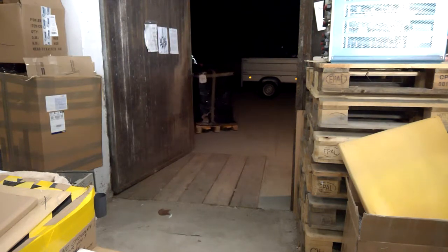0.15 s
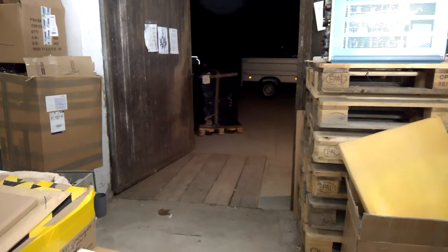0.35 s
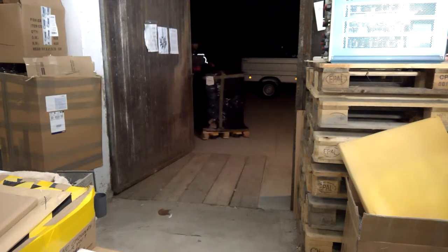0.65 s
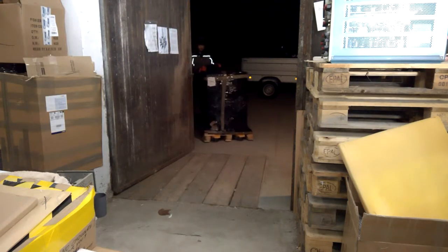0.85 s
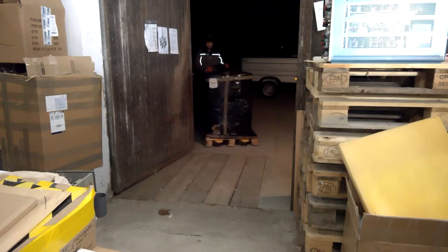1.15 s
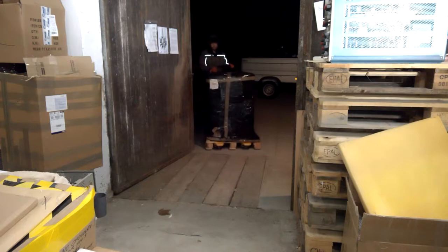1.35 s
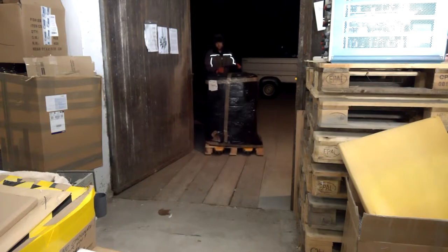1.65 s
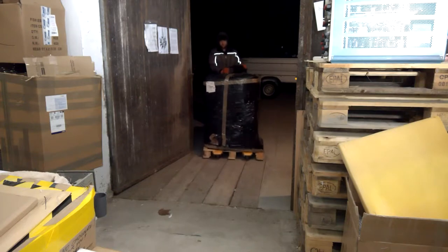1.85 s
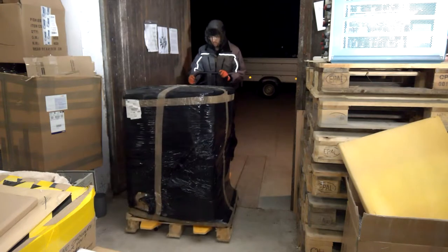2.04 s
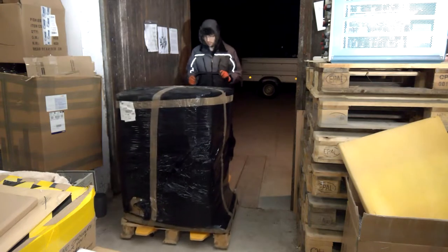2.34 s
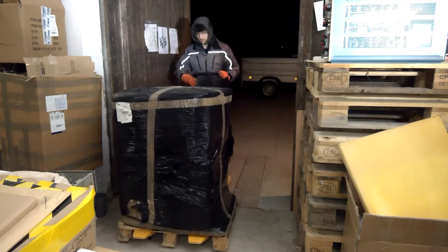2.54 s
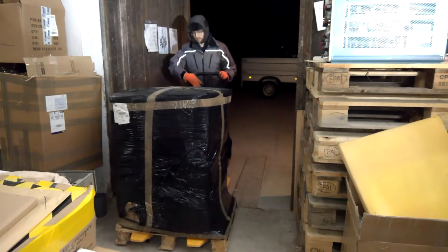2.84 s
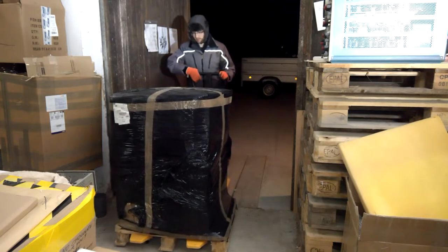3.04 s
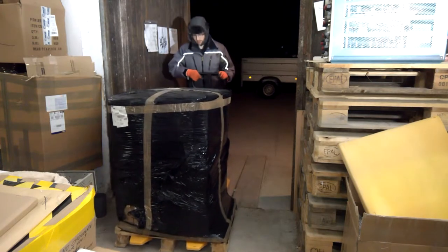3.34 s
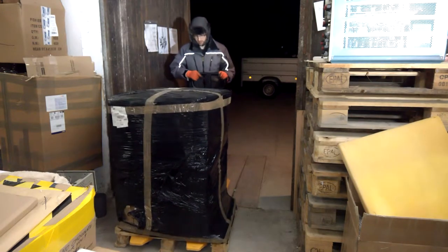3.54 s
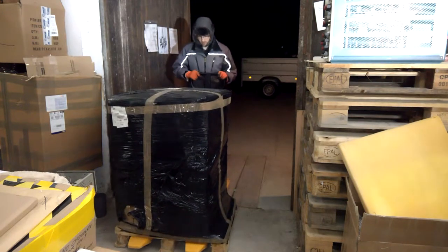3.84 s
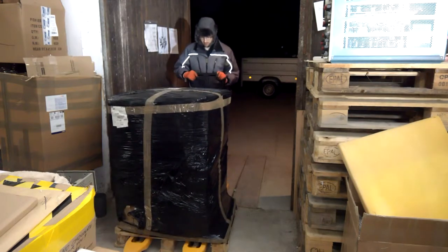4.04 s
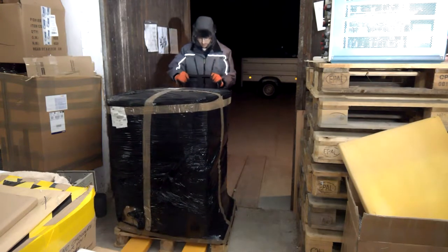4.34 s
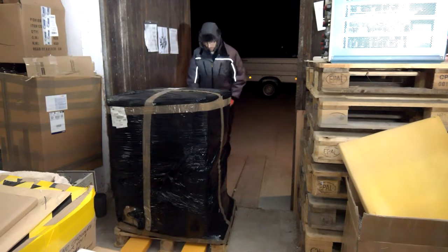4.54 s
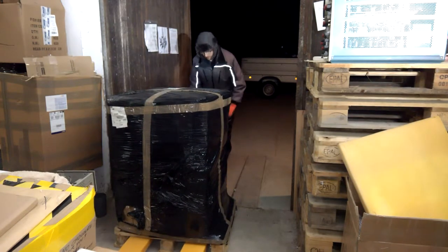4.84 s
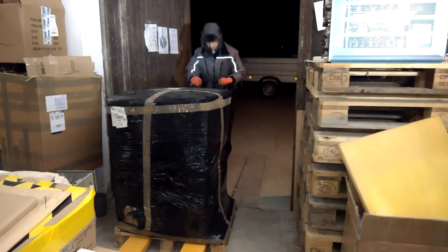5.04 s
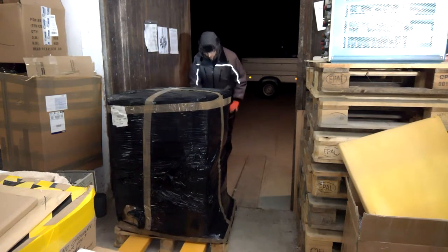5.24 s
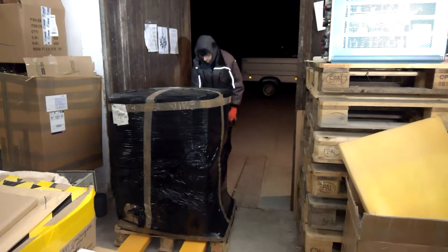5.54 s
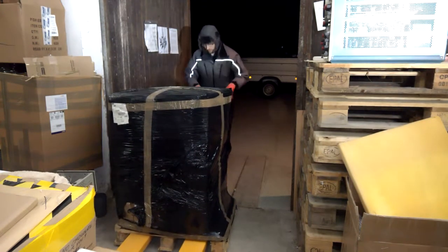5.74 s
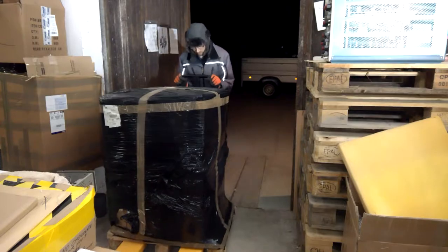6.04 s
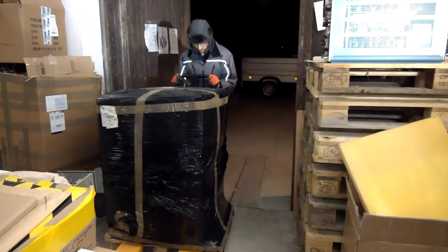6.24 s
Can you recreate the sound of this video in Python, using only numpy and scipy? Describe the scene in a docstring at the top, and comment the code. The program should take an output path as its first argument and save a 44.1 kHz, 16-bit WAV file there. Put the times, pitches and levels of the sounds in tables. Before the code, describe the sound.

Pallet truck wheels roll and rattle over booming boards, followed by close scuffs, rustling, a sharp metal clank and rapid pumping.

```python
"""A loaded hand pallet truck rolls over a hard floor and bumps over two edges. Its wheels shake the steel
frame, and the floor boards boom under the load. Then the scene changes: close by, the truck is pushed to and
fro: wheels rumble, soles scuff, wrap and clothes rustle, and steps thud. The handle clanks down and is pumped
in nine quick strokes, each a hollow knock with ringing steel. Loose parts tick and a dry joint squeaks. The
room adds a short echo to the blows, and a soft hush lies under the close sounds."""
import sys
import numpy as np
from scipy import signal
from scipy.fft import rfft, irfft, next_fast_len
from scipy.io import wavfile

SR = 44100
rng = np.random.default_rng(int(sys.argv[2]) if len(sys.argv) > 2 else 0)


def dump_mix(stems):
    """Bounce the given channels to the path in sys.argv[1] as a 16-bit WAV at rate SR."""
    frames = np.atleast_2d(stems).T  # one column per channel
    limited = np.clip(frames, -1, 1)  # hard clip at full scale
    pcm = np.round(limited * 32767).astype(np.int16)
    wavfile.write(sys.argv[1], SR, pcm)


N = 281358
CLOSE_START = round(1.8995 * SR)   # the sample where the close part begins
BLOW_WIDTH = .52   # a blow comes from one spot, so its left and right differ less

# Levels are relative. t60 is the time a sound takes to fade by 60 dB.
# A mode is a pitch at which a thing likes to ring. A spectrum says how strong each pitch is.
# The truck rolling in: t/s, rolling level/dB, rattle level/dB, grit level/dB, most shaken f/Hz
ROLL_IN = [(0.0, -37, -46, -57.5, 1270), (0.2, -37, -46.5, -59.5, 1600), (0.6, -36.5, -46, -56.5, 1600),
           (0.74, -37, -53, -58, 1600), (0.9, -40.5, -58.5, -61, 1100), (1.0, -29, -45, -48, 1100),
           (1.15, -31, -43, -53, 1100), (1.2, -33.5, -44.5, -55, 1270), (1.34, -33.5, -42, -50.5, 1270),
           (1.42, -33, -42.5, -51, 1600), (1.52, -34.5, -38.5, -50, 1600), (1.71, -32.5, -35, -51, 1600),
           (1.8, -30, -36, -47, 1600), (1.9, -35, -46.5, -50, 1600)]
# Modes of the forks and frame: f/Hz, width/Hz, level/dB
FRAME_MODES = [(459.3, 66, -0.5), (744, 62, -3), (1018, 29, -4), (1100, 40, -6.5), (1275, 35, -2.5),
               (1612, 40, -6), (2078, 160, -11.5), (2803, 60, -11), (2974, 68, -12.5), (3592, 80, -18.5),
               (3840, 50, -20.5), (4315, 140, -23), (4834, 190, -22), (5230, 70, -24), (6240, 207, -27)]
# Spectra of the noise between the frame's low modes and between its high ones: f/Hz, level/dB
LOW_FRAME_NOISE = [(180, -49.5), (300, -18), (467, -0.5), (1100, -7.5), (1600, -9), (2500, -29),
                   (3250, -54), (5500, -120)]
HIGH_FRAME_NOISE = [(1350, -33.5), (2300, -5.5), (2930, 0), (3210, -6), (6000, -19), (7800, -36),
                    (13200, -120)]
# Spectra of wheel rumble and of floor grit: f/Hz, level/dB
RUMBLE_SPECTRUM = [(15, -37.5), (40, -23.5), (60, -2), (92, -0.5), (134, -3.5), (162, 6.5), (260, 0.5),
                   (328, -3.5), (400, -5.5), (520, -27.5), (880, -120)]
GRIT_SPECTRUM = [(2940, -40.5), (5000, -17), (7000, -10.5), (9330, -13), (12000, -23), (14300, -24.5),
                 (19000, -21.5)]
# Bumps over edges, and handle clanks: t/s, clatter level/dB, step up per band/dB, thump level/dB, t60/s
EDGE_BUMPS = [(0.929, -35, 10, -73, 0.16), (0.934, -32.5, -14.5, -33.5, 0.19),
              (1.777, -67.5, -12.5, -36, 0.43), (1.803, -59.5, -7.5, -41, 0.22),
              (1.83, -47, 0, -36.5, 0.36), (1.848, -62, -12.5, -47, 0.11), (1.877, -47.5, 3, -25, 0.41),
              (1.885, -58, -13.5, -29.5, 0.24)]
HANDLE_CLANKS = [(2.289, -55, 12, -62, 0.11), (2.4845, -57, 12, -82, 0.18), (2.508, -54, 16, -80, .13),
                 (2.524, -50, 9, -74, 0.15), (2.712, -64.5, -21.5, -51, 0.17),
                 (2.7965, -45.5, -1.5, -44, 0.061), (3.083, -42.5, 2.5, -51.5, 0.24),
                 (3.446, -55, 1.5, -87, 0.6), (3.486, -40.5, 0.5, -81, 0.19),
                 (3.583, -55.5, -6.5, -84, 0.4), (4.238, -46.5, -5, -75, 0.3), (4.259, -39, 0.5, -67, 0.21),
                 (4.279, -35, -4, -56, 0.16), (4.2936, -22, 8, -36.5, .11), (4.348, -51.5, 16, -63, 0.064),
                 (4.3955, -38, 14, -70, 0.091), (4.515, -53.5, 2.5, -64, 0.089),
                 (5.931, -44.5, 4.5, -55, .1), (5.957, -55.5, 13, -73, 0.24), (5.994, -45, -3.5, -47, 0.22),
                 (6.01, -49.5, 11, -58, 0.12), (6.078, -58, 18.5, -80, 0.035), (6.108, -56.5, 4, -63, 0.11),
                 (6.152, -57, 18, -81, 0.32), (6.163, -47, 12, -68, 0.074), (6.187, -55, 14, -75, .04),
                 (6.273, -49, 9.5, -69, 0.14), (6.286, -42.5, 4.5, -65, 0.16),
                 (6.297, -33.5, 7.5, -54, 0.093)]
# Modes of the loaded pallet and the floor boards: f/Hz, level/dB, t60/s
BOARD_MODES = [(104, -13.5, 0.057), (232, -0.5, .06), (386, -1.5, 0.03), (584, -3.5, 0.015)]
# Booms of the floor boards: t/s, level/dB, f/Hz, t60/s
BOARD_BOOMS = [(.937, -19, 455, .12), (.94, -18, 720, .16), (.938, -17, 1085, 0.16), (.937, -18, 1310, .1),
               (.938, -14, 1540, .1), (.936, -21, 1760, .06), (.938, -20, 290, .15),
               (1.779, -15.5, 205, 0.65), (1.6, -22.5, 400, .1), (1.779, -23, 850, .06),
               (1.743, -26.5, 215, .3), (1.8, -28, 102, 0.65), (1.803, -21, 396, 0.47),
               (1.879, -13.5, 280, 0.43), (1.879, -11.5, 642, .07), (1.878, -17, 820, .06),
               (2.1, -16, 760, .08), (1.879, -18, 407, .2)]
# Pump strokes: t/s, knock level/dB, its low notes/dB, steel level/dB, knock f/Hz, steel f/Hz,
# wait until the handle is back/s
PUMP_STROKES = [(4.643, -33, -4, -40, 1400, 3000, 0.118), (4.789, -30.5, -11, -34.5, 1360, 3000, 0.112),
                (4.935, -31, -4.5, -36, 1330, 2880, 0.11), (5.08, -30.5, 1.5, -37.5, 1010, 2800, 0.1),
                (5.22, -28.5, 2.5, -38.5, 1010, 3520, 0.11), (5.368, -27, -1, -36, 1000, 3330, .11),
                (5.511, -26.5, -4, -37, 1050, 3140, .102), (5.658, -27.5, 2.5, -38, 1070, 3200, 0.098),
                (5.803, -28, 1.5, -39, 1040, 3170, 0.095)]
# Modes of the pump's hollow, the pump's steel, the handle and a free lever: f/Hz, level/dB, t60/s
HOLLOW_MODES = [(602, -10.5, 0.053), (706, -13, 0.043), (866, -6.5, .03), (1011, -2, .045),
                (1103, -4.5, 0.049), (1200, 1.5, .035), (1464, 2.5, 0.044)]
STEEL_MODES = [(2400, -6.5, 0.036), (2703, -2, .035), (3150, -1.5, .035), (3494, -6.5, 0.028),
               (3740, -4.5, .045), (4080, -8, 0.027), (4520, -3, 0.034), (4700, -1, 0.033), (5080, 0, 0.04),
               (5490, -3.5, .035), (6640, 2.5, 0.034), (7600, -5, 0.044), (8170, -6, .04), (9400, -7, .03),
               (10220, -8, .035), (11600, -3, .03), (13500, -8, .025), (14900, -7, .035)]
HANDLE_MODES = [(7100, -3.5, .07), (7560, -8, .08), (8146, -2.5, .07), (8450, -7.5, .07), (10420, -5, .07),
                (10650, -12.5, .1), (11700, -21.5, .1), (13700, -9, .08), (13880, -8.5, .08),
                (14650, -9.5, .08), (14900, -4, .075)]
LEVER_MODES = [(1997, -17, 0.11), (3370, -20, .1), (3920, -12, 0.11), (4110, -12, 0.15), (4780, -16, .06),
               (4925, -9, 0.1), (5015, 1.5, 0.11), (5010, -19, 0.38), (5000, -4, 0.091), (5935, -10, 0.093),
               (7965, -14, .07)]
# Nudges on the lever: t/s, level/dB, contact time/s
LEVER_NUDGES = [(3.077, -22, 0.012), (3.108, -32, .004), (3.132, -42, .004), (3.188, -46.5, .005)]
# Knocks with one clear pitch: t/s, level/dB, f/Hz, t60/s
PITCHED_KNOCKS = [(2.4, -46, 240, 0.11), (2.72, -39.5, 770, 0.15), (2.725, -41, 210, 0.14),
                  (3.2, -49, 150, 0.18), (4.134, -40, 450, 0.17), (4.5, -48.5, 540, 0.11),
                  (2.8, -36.5, 690, 0.14), (3.1, -46.5, 570, 0.099), (3.584, -34, 1610, 0.091),
                  (6.3, -28.5, 2520, 0.036), (6.299, -21.5, 3090, 0.027), (2.5, -46, 2950, 0.18),
                  (4.3, -33, 780, 0.13), (4.316, -35.5, 820, .08), (4.315, -32.5, 2700, .06),
                  (4.268, -38, 1200, .08), (4.394, -20.5, 3760, 0.044)]
# Cracks of hard contact: t/s, level/dB, lowest f/Hz, highest f/Hz
HARD_CRACKS = [(2.485, -26.5, 4020, 8800), (2.7974, -24.5, 3510, 9900), (4.2943, 2, 2520, 14900),
               (4.395, -15, 2480, 15100), (6.2968, -12, 1980, 9000)]
# Bright ticks of loose parts, and light touches on the lever (the rows near 5 kHz at 2.876, 2.928, 3.328,
# 3.345, 3.42 and 3.85 s): t/s, level/dB, f/Hz
BRIGHT_TICKS = [(.131, -50.5, 7000), (.385, -59, 4500), (.435, -55, 4200), (.79, -51, 8000),
                (1.045, -47, 8000), (1.853, -48, 9000), (0.2393, -45.5, 3120), (0.636, -42.5, 4050),
                (1.122, -44, 3220), (1.18, -38.5, 7600), (1.3513, -31, 11500), (1.52, -52, 3300),
                (1.6, -59, 3300), (1.702, -43, 3780), (1.736, -35.5, 3720), (2.0157, -44.5, 10600),
                (2.252, -46.5, 5800), (2.068, -51, 9500), (2.109, -53, 10500), (2.16, -51, 5000),
                (2.19, -55, 5000), (2.876, -53, 5000), (2.928, -54, 5000), (3.328, -59, 5300),
                (3.345, -55, 5200), (3.42, -64, 5000), (3.93, -62.5, 5300), (2.66, -52, 4400),
                (3.77, -60, 4900), (3.85, -63, 5200), (4.009, -63, 8700), (4.0367, -54, 10600),
                (4.0647, -54, 7360), (4.088, -50.5, 9330), (4.148, -41, 10100), (4.446, -49.5, 8500),
                (4.728, -59, 13000), (5.239, -37.5, 10100)]
# Squeaks of a dry joint: t/s, length/s, level/dB
JOINT_SQUEAKS = [(6.194, .048, -46.5), (6.322, 0.05, -44)]
# Modes of that joint: f/Hz, width/Hz, level/dB
JOINT_MODES = [(3470, 77, -16), (5750, 94, -2), (7300, 72, 3), (9100, 400, -8), (9990, 54, -12),
               (11700, 320, 0), (12300, 41, -7)]
# Pushing to and fro close by: t/s, rumble level/dB, scuff level/dB, rustle level/dB
TO_AND_FRO = [(1.9, -44, -48.5, -54.5), (1.99, -46, -49.5, -53), (2.14, -42.5, -46, -55.5),
              (2.25, -46, -50.5, -48.5), (2.37, -46, -39.5, -43.5), (2.45, -51, -47.5, -50.5),
              (2.56, -47.5, -49.5, -52), (2.65, -55, -56, -55), (2.8, -55, -40, -43.5),
              (2.89, -49.5, -48, -56), (2.93, -93, -54.5, -52), (3.05, -82, -52, -54),
              (3.33, -93, -57.5, -59), (3.41, -102, -58, -66), (3.5, -59.5, -51.5, -57),
              (3.7, -100, -59.5, -65), (3.86, -74, -67.5, -72.5), (4.07, -59.5, -64, -59.5),
              (4.21, -42.5, -54.5, -53.5), (4.26, -61, -54, -64), (4.35, -67, -63, -45),
              (4.57, -75, -76, -63.5), (4.75, -73.5, -71, -91.5), (5.3, -70, -70, -70),
              (5.88, -64.5, -69.5, -73), (5.92, -79, -66, -63), (6.0, -81, -40.5, -40),
              (6.13, -92.5, -77, -64), (6.165, -84.5, -49, -57), (6.22, -71, -66.5, -57),
              (6.38, -81, -47.5, -42.5)]
# Spectra of scuffing on the floor and of rustling wrap and clothes: f/Hz, level/dB
SCUFF_SPECTRUM = [(88, -24), (150, -6), (408, -9.5), (673, -2), (802, -6.5), (1170, -7.5), (2180, -9),
                  (3800, -15.5), (4940, -50), (8360, -120)]
RUSTLE_SPECTRUM = [(1650, 38.5), (2800, -34.5), (3290, 2.5), (5680, 5), (11500, -3.5), (13800, -1.5),
                   (15500, 14), (16300, -40)]
# Steps felt through the floor: t/s, level/dB
FOOTSTEPS = [(2.685, -35), (2.986, -42.5), (3.198, -50), (3.59, -46.5)]
# Spectrum of the room's hush: f/Hz, level/dB
HUSH_SPECTRUM = [(15, -10.5), (25, -21.5), (80, -23), (665, -13.5), (826, -20.5), (1210, -19),
                 (1860, -16.5), (3040, -15), (6670, -20), (14600, -14.5), (16300, -31)]
# The four bands of a blow (thump, then low, middle and high clatter): lowest f/Hz, highest f/Hz
BLOW_BANDS = [(80, 600), (600, 2000), (2000, 6000), (6000, 16000)]
# How alike left and right are: f/Hz, likeness (1 = the same)
STEREO_LIKENESS = [(60, 0.99), (240, 0.96), (950, 0.87), (3770, 0.31), (15000, 0.026)]


def rolling_truck():
    """Flat spots on the wheels and the rough floor shake the frame: rumble, ringing and hissing grit."""
    rolling_db, rattle_db, grit_db, shaken_hz = (curve[:CLOSE_START] for curve in curves(ROLL_IN))
    count = CLOSE_START
    shake = grainy(per_s=300, depth=.6, count=count) * from_db(drift(12, count))
    rumble_db = -39.5 + .79 * (rolling_db - rolling_db.mean())   # swings less than the rolling level
    out = from_db(rumble_db) * coloured(noise_pair(count), RUMBLE_SPECTRUM, flicker_db=3)
    out += from_db(grit_db) * coloured(shake, GRIT_SPECTRUM, flicker_db=-.5)
    for level_db, modes, spectrum in ((rolling_db, FRAME_MODES[:7], LOW_FRAME_NOISE),
                                      (rattle_db, FRAME_MODES[7:], HIGH_FRAME_NOISE)):
        ringing = 0
        for hz, width, db in modes:
            lift_db = 8 * np.exp(-(np.log2(hz / shaken_hz) / .066) ** 2)   # near the most shaken pitch
            mode = resonate(resonate(shake, hz, 1.5 * width), hz, 1.5 * width)
            ringing += from_db(db + lift_db + 3 * drift(7, count)) * stereo(mode, hz)
        between = coloured(shake[::-1], spectrum, flicker_db=2)   # same grains, the other noise
        out += from_db(level_db) * normalise(normalise(ringing) + from_db(-3) * between)
    return out


def edge_bumps():
    """The wheels hit edges in the floor, which makes the boards and forks ring."""
    fork_modes = [(hz, db, np.log(1000) / np.pi / width) for hz, width, db in FRAME_MODES[1:]]
    return blows(EDGE_BUMPS, BOARD_MODES + fork_modes, ring_db=[9, -.5, -5, -1.5],
                 middle_db=6, rise_s=.0049, t60_ratio=.83)


def board_booms():
    """The floor boards boom under the load; each boom is one fading tone."""
    start_s, db, hz, t60 = np.array(BOARD_BOOMS).T[:, :, None]
    age = np.maximum(np.arange(CLOSE_START) / SR - start_s, 0)
    return (from_db(db - 60 * age / t60) * np.sin(2 * np.pi * hz * age)).sum(axis=0)


def pump():
    """Each stroke knocks on the hollow pump and rings its steel; both sound once more, faintly."""
    out = np.zeros((2, N))
    for start_s, knock_db, low_db, steel_db, knock_hz, steel_hz, _ in PUMP_STROKES:
        # Modes near the stroke's pitches ring most; the low notes have a level of their own.
        hollow = [(hz, db + (low_db if hz < 800 else -30 * abs(np.log2(hz / knock_hz))), t60)
                  for hz, db, t60 in HOLLOW_MODES]
        steel = [(hz, db - 9 * abs(np.log2(hz / steel_hz)), t60) for hz, db, t60 in STEEL_MODES]
        knock = from_db(5.5) * struck(hollow, rise_s=.0023, scatter_db=1.5)
        knock += from_db(-12) * stereo_band(burst(.098, .0062, 6000), .6 * knock_hz, 1.59 * knock_hz)
        knock += from_db(low_db - 24) * stereo_band(burst(.16, .008, 6000), 238, 660)
        contact = burst(t60=.1, rise_s=.0017, count=6000)
        clack, tick = (from_db(-2) * stereo_band(contact, *edges) for edges in BLOW_BANDS[2:])
        clack += from_db(11) * struck(steel, rise_s=.0014, scatter_db=2.5)
        add(out, start_s, from_db(knock_db) * knock + from_db(steel_db) * (clack + from_db(-2) * tick))
        add(out, start_s + .042, from_db(knock_db - 25) * knock)   # the knock bounces back
        add(out, start_s + .026, from_db(steel_db - 22.5) * (clack + tick)[::-1])   # steel touches again
    return out


def handle_clanks():
    """The handle clanks and rings the truck; its parts are too small to make deep bass."""
    modes = BOARD_MODES[2:] + HOLLOW_MODES + within(STEEL_MODES, *BLOW_BANDS[2]) + HANDLE_MODES
    clanks = blows(HANDLE_CLANKS, modes, ring_db=[-2, -19, -15.5, -16],
                   middle_db=3.5, rise_s=.0055, t60_ratio=.93, hard_below_s=.115)
    return filtered(clanks, "high", 220)


def knocks():
    """Short bursts of noise, each ringing at one clear pitch."""
    out = np.zeros((2, N))
    width_hz = 260
    for start_s, db, hz, t60 in PITCHED_KNOCKS:
        contact = burst(t60, rise_s=.00099, crack=0)
        ringing = resonate(resonate(contact, hz, width_hz), hz, 2 * width_hz)
        add(out, start_s, from_db(db) * stereo(ringing, hz) * np.sqrt(SR / width_hz))
    return out


def cracks():
    """Hard contact makes a bare crack: one click, cut down to a band of pitches."""
    out = np.zeros((2, N))
    click = np.zeros((2, 400))
    click[0, 0] = SR / 2
    for start_s, db, low_hz, high_hz in HARD_CRACKS:
        add(out, start_s, from_db(db) * stereo_band(click, low_hz, high_hz) / (high_hz - low_hz))
    return out


def lever():
    """A few nudges leave a free steel lever ringing, a little roughly."""
    out = np.zeros((2, N))
    for start_s, db, contact_s in LEVER_NUDGES:
        nudge = burst(t60=8 * contact_s, rise_s=contact_s, count=14000, crack=0)
        rough = ring_modes(nudge, LEVER_MODES, scatter_db=-1.5)
        clear = struck(LEVER_MODES, contact_s, scatter_db=-.5, count=14000)
        add(out, start_s, from_db(db) * (clear + from_db(-3.5) * rough))
    return out


def ticks():
    """Loose parts tick brightly, light touches on the lever tick near 5 kHz, and the handle ticks faintly as it
    comes back after each stroke."""
    out = np.zeros((2, N))
    handle_returns = [(start_s + wait_s, -57.5, 5570) for start_s, *_, wait_s in PUMP_STROKES]
    for start_s, db, hz in BRIGHT_TICKS + handle_returns:
        snap = burst(t60=.082, rise_s=.0029, count=4400)
        add(out, start_s, from_db(db) * stereo_band(snap, .533 * hz, min(2.25 * hz, .45 * SR)))
    return out


def squeaks():
    """A dry joint slips unevenly, which rings its high modes."""
    out = np.zeros((2, N))
    for start_s, length_s, level_db in JOINT_SQUEAKS:
        slips = grainy(per_s=200, depth=.9, count=round(length_s * SR))
        slips = np.pad(slips, ((0, 0), (0, 900)))   # time to ring out
        ringing = sum(from_db(db) * stereo(resonate(slips, hz, width), hz)
                      for hz, width, db in JOINT_MODES)
        add(out, start_s, from_db(level_db) * normalise(ringing))
    return out


def scrape():
    """A dull, grainy scrape swells, holds for a moment and stops."""
    t = np.arange(N) / SR
    full_s, end_s = 4.194, 4.24
    level_db = -43 - 99 * np.maximum(full_s - t, 0) - 600 * np.maximum(t - end_s, 0)
    return from_db(level_db) * stereo_band(grainy(per_s=200, depth=.16, count=N), 200, 880)


def pushing_to_and_fro():
    """Slow wheels and steps rumble, soles and pallet scuff the floor, wrap and clothes crinkle."""
    count = N - CLOSE_START
    rumble, scuff, rustle = from_db(curves(TO_AND_FRO))[:, CLOSE_START:]
    unsteady = from_db(2 * drift(14, count))
    rubbing = grainy(per_s=150, depth=.3, count=count) * unsteady
    crinkling = grainy(per_s=150, depth=.45, count=count) * unsteady
    layers = [(rumble + footstep_gain()[CLOSE_START:], noise_pair(count), RUMBLE_SPECTRUM),
              (scuff, rubbing, SCUFF_SPECTRUM),
              (rustle, crinkling, RUSTLE_SPECTRUM)]
    return sum(gain * coloured(noise, spectrum, flicker_db=2) for gain, noise, spectrum in layers)


def footstep_gain(rise_s=.013, t60=.29):
    """Each step makes the floor's rumble swell and fade."""
    start_s, db = np.array(FOOTSTEPS).T[:, :, None]
    age = np.maximum(np.arange(N) / SR - start_s, 0)
    return (from_db(db - 60 * age / t60) * (1 - np.exp(-age / rise_s))).sum(axis=0)


def room_hush():
    """The room's soft, even noise under the close sounds."""
    return from_db(-68) * coloured(noise_pair(N - CLOSE_START), HUSH_SPECTRUM, flicker_db=2)


def with_echo(x, t60=.14, wall_cut_hz=9000):
    """Sound bounces between the walls on six paths a side, weaker and duller on every trip."""
    size = next_fast_len(x.shape[1] + SR)
    hz = np.arange(size // 2 + 1) * SR / size
    trip_s = rng.uniform(.012, .035, (2, 6, 1))
    one_trip = from_db(-60 * trip_s / t60) / (1 + 1j * hz / wall_cut_hz)
    one_trip *= np.exp(-2j * np.pi * hz * trip_s)   # the delay
    all_trips = (one_trip / (1 - one_trip)).sum(axis=1)
    echoes = irfft(rfft(x.mean(axis=0), size) * all_trips, size)
    return x + from_db(-22) * echoes[:, :x.shape[1]]


def blows(rows, modes, ring_db, middle_db, rise_s, t60_ratio, hard_below_s=0):
    """Each blow is a thump and three bands of clatter that ring the body; higher bands fade sooner."""
    out = np.zeros((2, N))
    for start_s, db, bright_db, thump_db, t60 in rows:
        levels_db = thump_db, db - bright_db, db + middle_db, db + bright_db
        contact_s = .0007 if t60 < hard_below_s else rise_s   # short, hard contacts rise faster
        for k, (level_db, edges) in enumerate(zip(levels_db, BLOW_BANDS)):
            clatter = burst(t60 * t60_ratio ** k, contact_s, crack=2.27 if k else 1.2)
            ringing = ring_modes(filtered(clatter, "band", edges), within(modes, *edges), scatter_db=3)
            blow = stereo_band(clatter, *edges) + from_db(ring_db[k]) * ringing
            add(out, start_s, from_db(level_db) * blow)
    return out


def struck(modes, rise_s, scatter_db, count=6000):
    """A clean blow: each mode is a fading tone with a random phase and a slightly random strength."""
    t = np.arange(count) / SR
    out = 0
    for (hz, db, t60), (chance, *phases) in zip(modes, rng.standard_normal((30, 3))):
        envelope = from_db(db + scatter_db * chance - 60 * t / t60) * (1 - np.exp(-t / rise_s))
        tones = np.sin(2 * np.pi * (hz * t + np.array(phases)[:, None]))
        out += envelope * stereo(tones * [[1], [BLOW_WIDTH]], hz)
    return out


def ring_modes(noise, modes, scatter_db):
    """Noise rings every mode, each with a slightly random strength."""
    out = 0
    for (hz, db, t60), chance in zip(modes, rng.standard_normal(30)):
        ringing = resonate(noise, hz, width_hz=np.log(1000) / np.pi / t60)
        out += from_db(db + scatter_db * chance) * stereo(ringing, hz) * np.sqrt(SR * t60 / 7)
    return out


def burst(t60, rise_s, count=9000, crack=3.2):
    """Noise that rises quickly and fades; crack makes its first instant stronger."""
    t = np.arange(count) / SR
    envelope = (1 - np.exp(-t / rise_s)) * from_db(-60 * t / t60) * (1 + crack * np.exp(-t / .0075))
    return noise_pair(count) * envelope * [[1], [BLOW_WIDTH]]


def grainy(per_s, depth, count):
    """Noise whose strength jumps in short grains: many tiny hits of uneven size."""
    hits = (rng.random(count) < per_s / SR) * rng.exponential(1, count)
    grains = normalise(signal.lfilter([1], [1, -.99], hits))
    return noise_pair(count) * normalise(1 + depth * grains)


def coloured(noise, spectrum, flicker_db):
    """Shape noise to a spectrum in half-octave bands, each flickering on its own."""
    points_hz, points_db = np.transpose(spectrum)
    edges = 15 * 2 ** np.arange(0, 10.6, .5)
    out = 0
    for k, (low, high) in enumerate(zip(edges, edges[1:])):
        hz = np.sqrt(low * high)
        if points_hz[0] < hz < points_hz[-1]:
            level_db = np.interp(np.log(hz), np.log(points_hz), points_db)
            gain = from_db(level_db + flicker_db * drift(5.3, noise.shape[1]))
            sign = (-1) ** k   # flipping every other band helps neighbours join
            out += sign * gain * stereo(filtered(noise, "band", [low, high]), hz)
    return normalise(out)


def drift(rate_hz, count):
    """A slow random wobble, about 1 in size."""
    pole = np.exp(-80 * np.pi * rate_hz / SR)
    noise = rng.standard_normal(count // 40 + 2002)   # one value every 40 samples
    slow = signal.lfilter([1], [1, -2 * pole, pole * pole], noise)[2000:]
    return np.interp(np.arange(count) / 40, np.arange(len(slow)), normalise(slow))


def noise_pair(count):
    """Two white noises: one for what left and right share, one for how they differ."""
    return rng.standard_normal((2, count))


def stereo(pair, hz):
    """Turn such a pair into left and right, which are more alike at low pitches."""
    points_hz, likeness = np.transpose(STEREO_LIKENESS)
    alike = np.interp(np.log(hz), np.log(points_hz), likeness)
    return np.sqrt((1 + alike) / 2) * pair[0] + np.sqrt((1 - alike) / 2) * pair[1] * [[1], [-1]]


def stereo_band(noise, low_hz, high_hz):
    """One band of a noise pair in stereo, raised to make up for the pitches cut away."""
    band = filtered(noise, "band", [low_hz, high_hz], order=4)
    return stereo(band, np.sqrt(low_hz * high_hz)) * np.sqrt(SR / 2 / (high_hz - low_hz))


def resonate(x, hz, width_hz):
    """Let one pitch through at full strength and weaken the rest."""
    r = np.exp(-np.pi * width_hz / SR)
    gain = (1 - r * r) / 2
    return signal.lfilter([gain, 0, -gain], [1, -2 * r * np.cos(2 * np.pi * hz / SR), r * r], x)


def filtered(x, kind, hz, order=2):
    return signal.sosfilt(signal.butter(order, hz, kind, fs=SR, output="sos"), x)


def within(modes, low_hz, high_hz):
    return [mode for mode in modes if low_hz <= mode[0] < high_hz]


def curves(rows):
    """Join a table's points in time with straight lines: one curve for each column after the first."""
    times, *columns = np.transpose(rows)
    return [np.interp(np.arange(N) / SR, times, column) for column in columns]


def add(out, start_s, sound):
    at = round(start_s * SR)
    out[:, at:at + sound.shape[1]] += sound[:, :N - at]


def from_db(db):
    return 10 ** (np.asarray(db) / 20)


def normalise(x):
    return x / np.sqrt(np.mean(x ** 2) + 1e-20)


def scene():
    """The truck rolls in; then the scene changes, and close by it is pushed about and pumped."""
    bumps, clanks = edge_bumps(), handle_clanks()
    far = rolling_truck() + with_echo(bumps[:, :CLOSE_START] + board_booms())
    far *= np.minimum(np.arange(CLOSE_START)[::-1] / SR / .0015, 1)   # a very quick fade at its end
    close = pushing_to_and_fro() + room_hush()
    handling = clanks + knocks() + cracks() + scrape() + pump() + lever() + squeaks()
    close += with_echo(handling[:, CLOSE_START:])
    balance = from_db([[-.25], [.25]])   # the right side is a little louder
    return (np.hstack([far, close]) + ticks()) * balance


def record(dry):
    """The microphone loses deep bass, dips in the high treble, rounds loud peaks and cuts the very top."""
    heard = filtered(dry, "high", 45)
    heard -= .35 * resonate(heard, hz=12800, width_hz=3500)
    rounded = 1.2 * np.tanh(heard / 1.2)
    return signal.sosfilt(signal.cheby2(12, 70, 16700, fs=SR, output="sos"), rounded)


dry = scene()
out = record(dry)
dump_mix(out)
```